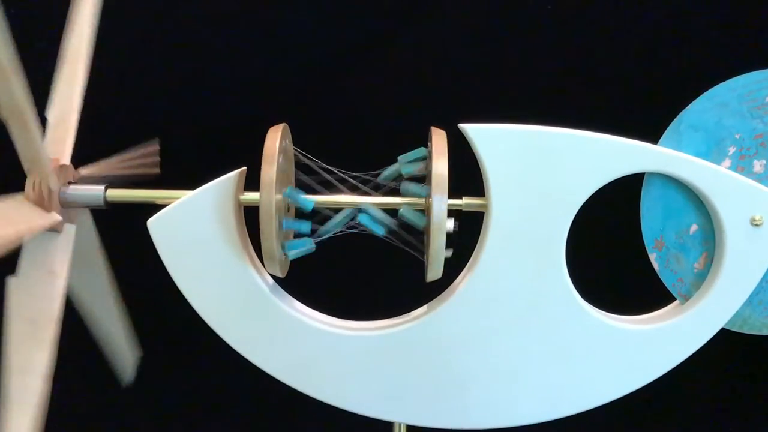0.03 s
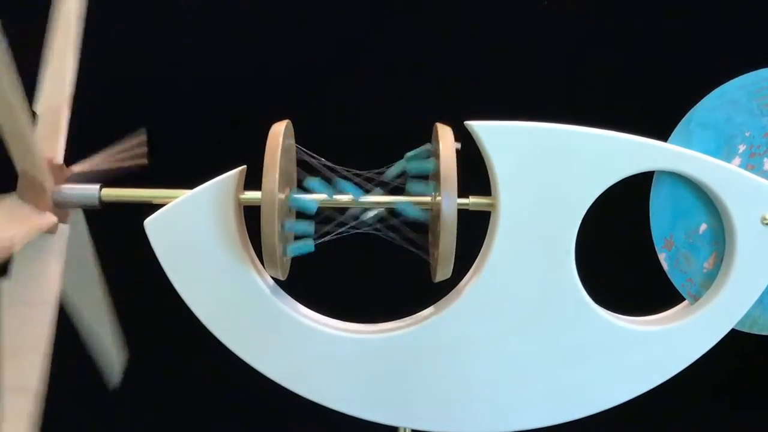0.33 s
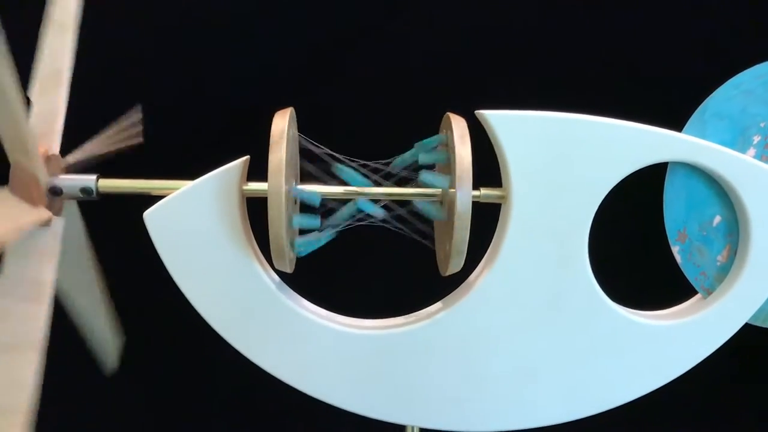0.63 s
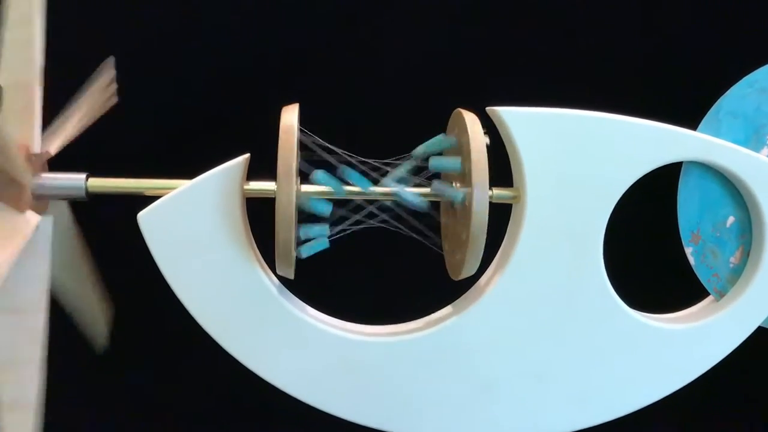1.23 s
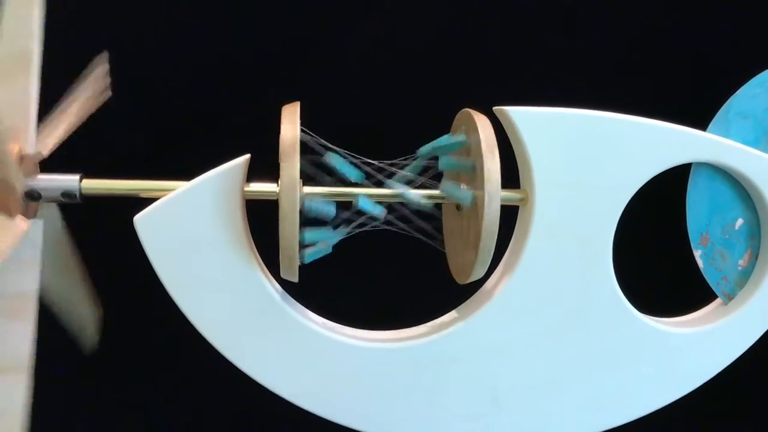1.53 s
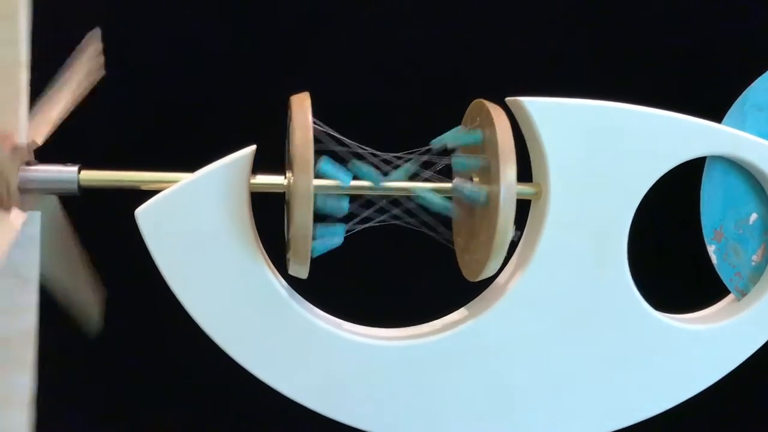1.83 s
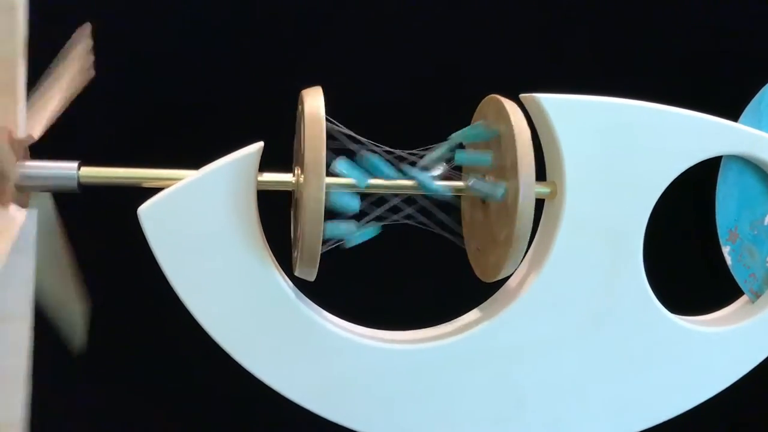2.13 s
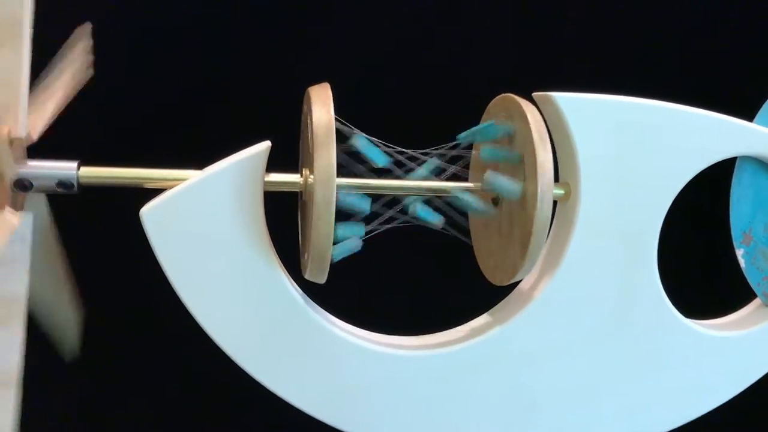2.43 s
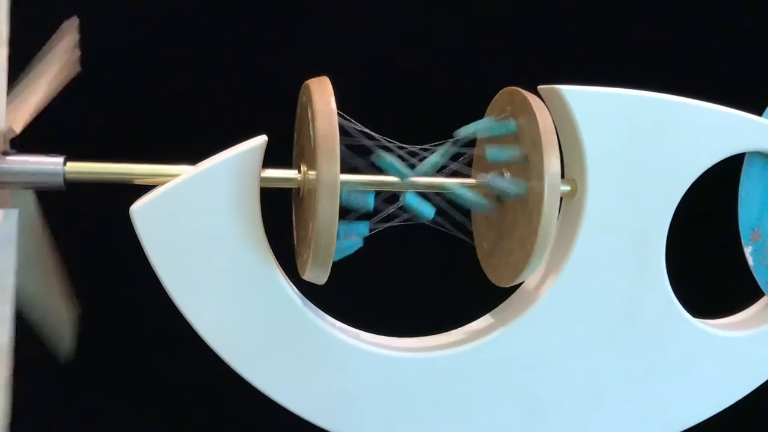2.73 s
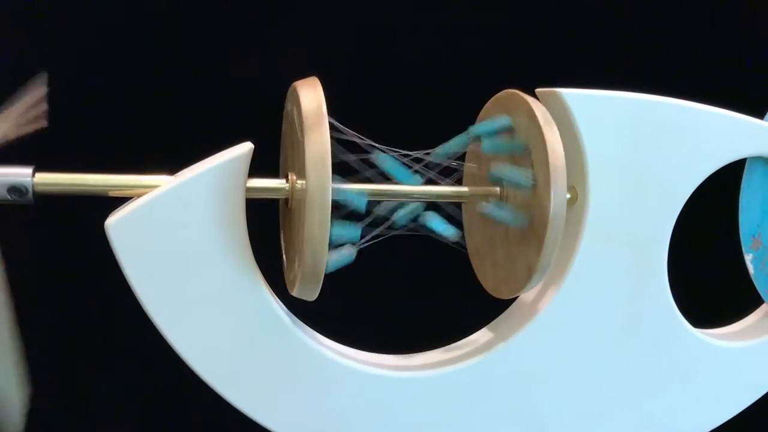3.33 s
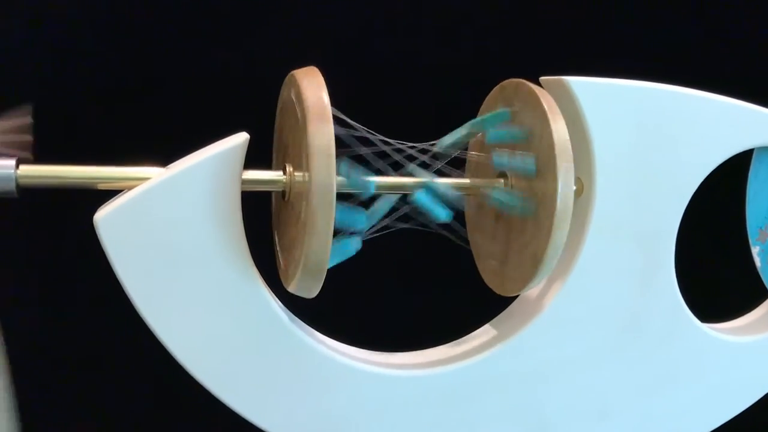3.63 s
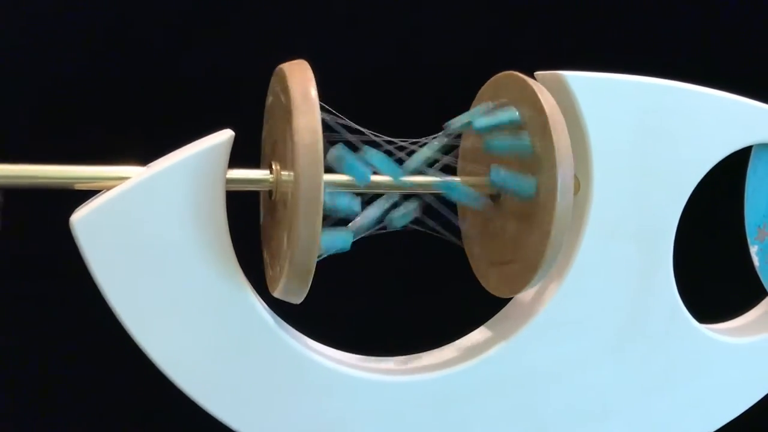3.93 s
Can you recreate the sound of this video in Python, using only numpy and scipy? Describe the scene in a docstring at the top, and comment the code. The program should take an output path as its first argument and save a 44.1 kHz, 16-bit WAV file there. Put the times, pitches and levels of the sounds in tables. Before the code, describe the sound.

Small tubes clatter against each other and two wooden discs on a turning sculpture, a quick, uneven run of light knocks, high pings and clicks. Behind it are faint room air and hum, and two low microphone bumps.

```python
"""You first hear light, uneven clattering: wooden knocks, short pings and bright clicks.
It is a wind toy turning slowly in a room. Small tubes slide on strings between two wooden discs
and drop against the discs and each other. A longer ring swells twice a turn, and a few sharp snaps
stand out. Behind it are two low bumps on the microphone, faint air and mains hum."""
import sys
import numpy as np
from scipy import signal
from scipy.fft import rfft, irfft
from scipy.io import wavfile

SR = 44100
rng = np.random.default_rng(int(sys.argv[2]) if len(sys.argv) > 2 else 0)


def to_wav(sig):
    """Store sig (one row per channel, or 1-D mono) as 16-bit WAV at the path in sys.argv[1].

    Samples outside -1..1 are clipped; the rate is SR.
    """
    pcm = np.clip(np.atleast_2d(sig), -1, 1) * 32767
    pcm = np.round(pcm).astype(np.int16)
    wavfile.write(sys.argv[1], SR, pcm.T)  # frames by channels


N = 176400
AGE = np.arange(SR // 3) / SR  # seconds since a blow
BLOW_GAIN = np.sqrt(.01 * SR)  # a blow's levels count its energy as if spread over 10 ms
TOP_HZ = 16000

# The blows of the falling tubes: t/s, knock level/dB, ping level/dB, ping f/Hz, click level/dB
BLOWS = [(0.0317, -41, -46, 4270, -36.5), (0.0577, -39, -38.5, 4370, -37),
         (0.0844, -38.5, -40.5, 3930, -40.5), (0.1641, -35.5, -33, 4410, -37),
         (0.2134, -46, -42, 4520, -41), (0.2641, -48, -28.5, 4430, -38.5), (0.3071, -45, -32, 4560, -41.5),
         (0.352, -44.5, -33.5, 4490, -44.5), (0.4413, -50, -36, 4540, -39),
         (0.504, -39.5, -41.5, 4150, -38.5), (0.538, -38, -41.5, 3900, -43),
         (0.5564, -40.5, -42, 4500, -38.5), (0.6108, -35.5, -38.5, 4000, -41.5),
         (0.633, -40.5, -31.5, 4400, -35), (0.733, -44, -29.5, 4400, -39),
         (0.7611, -40, -27.5, 4380, -30.5), (0.8303, -52, -31.5, 4590, -43), (0.8429, -50, -33, 4520, -42),
         (0.8665, -39, -37, 4210, -43.5), (0.9321, -38, -40.5, 4220, -50), (0.9773, -41, -42, 4660, -32),
         (1, -39.5, -38, 4260, -40), (1.0265, -38.5, -42, 3840, -39.5), (1.0934, -35.5, -28, 4420, -33),
         (1.209, -44.5, -28, 4510, -36.5), (1.2399, -46.5, -29.5, 4550, -33),
         (1.276, -47.5, -40.5, 4400, -40), (1.3126, -45, -34.5, 4450, -49), (1.3716, -48, -33, 4670, -34.5),
         (1.414, -42.5, -37.5, 4640, -39.5), (1.4376, -38.5, -42.5, 4150, -38),
         (1.4591, -36, -43, 3940, -38), (1.4903, -40.5, -39.5, 4390, -39.5),
         (1.5435, -40, -31.5, 4380, -41.5), (1.5665, -36, -43, 4000, -38), (1.636, -43.5, -27, 4450, -34.5),
         (1.6796, -47.5, -39.5, 4430, -38), (1.7422, -44, -33.5, 4370, -51),
         (1.7616, -44.5, -31.5, 4680, -38.5), (1.7996, -54, -33.5, 4750, -39.5),
         (1.8143, -40.5, -44, 4000, -54), (1.864, -35.5, -38.5, 4130, -41.5), (1.904, -43, -38, 4540, -42),
         (1.9153, -38, -36.5, 4400, -38.5), (1.953, -36.5, -51, 4400, -35.5),
         (2.0021, -40.5, -34, 4140, -40.5), (2.0172, -35.5, -38, 4830, -32.5),
         (2.1, -44, -28.5, 4420, -33.5), (2.178, -44.5, -27, 4730, -31), (2.2868, -46, -33.5, 4640, -30.5),
         (2.3257, -39.5, -35, 4590, -36), (2.3771, -33.5, -44, 4380, -35.5),
         (2.419, -40.5, -40.5, 4400, -38), (2.4619, -43, -34, 4570, -31.5), (2.4659, -33.5, -33, 4790, -41),
         (2.552, -43.5, -36, 4690, -33), (2.6157, -39.5, -33.5, 4380, -45.5),
         (2.6665, -46.5, -33.5, 4700, -39.5), (2.6919, -47, -34, 4470, -39.5),
         (2.7611, -34, -42, 4020, -45), (2.8185, -36, -36, 4220, -34.5), (2.8274, -37.5, -41, 4500, -33.5),
         (2.8529, -37.5, -55, 3930, -31.5), (2.9194, -34, -29, 4410, -31.5),
         (2.9983, -40, -28.5, 4430, -33.5), (3.0882, -37, -29, 4730, -33),
         (3.1724, -42.5, -33, 4690, -32.5), (3.206, -36.5, -34.5, 4590, -34), (3.233, -39, -40, 3880, -37),
         (3.2655, -32.5, -49, 4000, -36.5), (3.2937, -41.5, -43, 4400, -37),
         (3.3351, -34, -37, 4700, -30.5), (3.3439, -37, -33, 4340, -35), (3.4243, -40, -36.5, 4730, -31.5),
         (3.496, -37.5, -30.5, 4460, -30), (3.517, -46, -34.5, 4160, -40), (3.53, -43, -38, 4670, -35.5),
         (3.5547, -35, -39.5, 3820, -45), (3.6517, -34.5, -46, 4160, -45.5),
         (3.6625, -41, -37, 4650, -33.5), (3.6853, -35, -37.5, 4170, -37.5),
         (3.722, -35.5, -65, 4470, -30.5), (3.7696, -42, -30.5, 4440, -39), (3.7806, -34.5, -40, 4460, -32),
         (3.8284, -44, -38, 4720, -38.5), (3.9035, -47.5, -35.5, 4400, -41.5),
         (3.9354, -44.5, -27.5, 4680, -27), (3.9685, -43.5, -36.5, 4370, -40),
         (3.9877, -39.5, -32, 4670, -34)]
def tubes():
    """Each falling tube strikes once and bounces faintly twice; parts so small give off no bass."""
    out = np.zeros(N)
    for start, *strike in BLOWS:
        sound = blow(start, *strike)
        add(out, start, sound)
        waits_s = np.cumsum(rng.exponential(.007, size=2))
        bounces_db = -14 + 2.5 * (rng.standard_normal(2) - np.arange(2))
        for wait, db in zip(waits_s, bounces_db):
            add(out, start + wait, undb(db) * sound)
    return signal.sosfilt(signal.butter(4, 747, "highpass", fs=SR, output="sos"), out)


def blow(start, knock_db, ping_db, ping_hz, click_db):
    """One blow knocks, pings and clicks at once; the other tubes ring along, heard in the room's echo."""
    knock = undb(knock_db) * (wood_knock() + long_ring(start))
    ping = undb(ping_db) * tube_ping(ping_hz)
    other_tubes = undb(ping_db - 17.5) * fading_tones([(4410, 0)], fade_s=.095)
    click = undb(click_db) * contact_click(click_db)
    echo = room_echo(undb(-6) * knock + undb(-15) * ping + other_tubes + undb(-12.5) * click)
    return BLOW_GAIN * (knock + ping + click + echo)


# The tones the wooden parts make when struck: f/Hz, level/dB
WOOD_TONES = [(860, -9), (1015, -5), (1450, -7), (1640, -5), (1970, 4.5), (2090, 5.5), (3370, 7.5)]
def wood_knock():
    """The struck wooden discs take a moment to answer, then quickly fall silent."""
    wood = fading_tones(WOOD_TONES, fade_s=.078) + undb(-4) * noise_burst(895, 4750, fade_s=.03)
    rise = 1 - np.exp(-AGE / .0006)
    return unit(wood * rise)


# The tones of the longer ring: f/Hz, level/dB
RING_TONES = [(2230, -2.5), (2440, -9.5)]
def long_ring(start):
    """A ring outlasts the knock; how loud it is depends on how far the toy has turned."""
    half_turn_s, loudest_at_s = .4532, .054
    swell = np.cos(2 * np.pi * (start - loudest_at_s) / half_turn_s)
    return undb(-12 + 7.5 * swell) * fading_tones(RING_TONES, fade_s=.19)


def tube_ping(hz):
    """The tube itself gives one short, high tone with a little noise."""
    tone = unit(np.sin(2 * np.pi * hz * AGE) * fade(.026))
    return unit(tone + undb(-5.5) * noise_burst(3535, 4775, fade_s=.019))


# The very high tones made where two parts meet: f/Hz, level/dB
CLICK_TONES = [(6420, 5), (10200, -2), (11550, -1.5), (14400, -10)]
def contact_click(db):
    """The parts click as they touch; the harder the click, the brighter it is."""
    tones = fading_tones(CLICK_TONES, fade_s=.021, db_per_octave=2.5 * (db + 31))
    return unit(tones + undb(-2) * noise_burst(4450, 12350, fade_s=.0105))


# Tubes landing on their rims: t/s, level/dB
RIM_LANDINGS = [(0.2641, -42.5), (1.095, -35), (3.3352, -27)]
def rim_snaps():
    """A tube landing on its hard rim snaps without echo, using only the highest click tones."""
    out = np.zeros(N)
    high_tones = CLICK_TONES[1:]
    lowest_hz = high_tones[0][0]
    for start, db in RIM_LANDINGS:
        snap = fading_tones(high_tones, fade_s=.021) + noise_burst(lowest_hz, TOP_HZ, fade_s=.0105)
        add(out, start, undb(db) * BLOW_GAIN * unit(snap))
    return out


def room_echo(sound):
    """Close echoes, then a soft, duller tail; they differ for each blow because the tubes move."""
    delay_s = .0045
    early, late = rng.standard_normal((2, len(AGE))) * (AGE > delay_s)
    late = signal.sosfilt(signal.butter(1, 12000, "lowpass", fs=SR, output="sos"), late)
    echoes = undb(14.5) * early * fade(.04) + late * fade(.33)
    return signal.fftconvolve(sound, unit(echoes))[:len(sound)]


# Low bumps on the microphone: t/s, level/dB, starting f/Hz
LOW_BUMPS = [(1.861, -34.5, 82.5), (3.814, -22, 187)]
def microphone_bumps():
    """Soft thumps on the microphone sink in pitch as they fade."""
    end_hz, sink_s, rise_s = 53.4, .0062, .0029
    loudness = (1 - np.exp(-AGE / rise_s)) * fade(.094)
    out = np.zeros(N)
    for start, db, start_hz in LOW_BUMPS:
        hz = end_hz + (start_hz - end_hz) * np.exp(-AGE / sink_s)
        add(out, start, undb(db) * loudness * np.sin(2 * np.pi * np.cumsum(hz) / SR))
    return out


# How strong the room's air noise is from low to high pitch: f/Hz, relative level/dB
AIR_SHAPE = [(25, -11.5), (65, -3), (210, -7.5), (310, -14), (4000, -21.5), (16000, -40.5)]
def room_air():
    """The still air of the room is a faint, steady noise, strongest in the bass."""
    hz, db = np.array(AIR_SHAPE).T
    all_hz = np.maximum(np.fft.rfftfreq(N, 1 / SR), 1)
    gains = undb(np.interp(np.log(all_hz), np.log(hz), db))
    air = irfft(rfft(rng.standard_normal(N)) * gains, N)
    return undb(-58.5) * air / np.std(air)


def mains_hum():
    """Mains electricity hums on one low, steady tone."""
    hum_hz = 119.5
    return undb(-58.5) * np.sqrt(2) * np.sin(2 * np.pi * hum_hz * np.arange(N) / SR)


def fading_tones(table, fade_s, db_per_octave=0):
    """A struck part rings: its first tone lasts fade_s, higher ones die sooner. No two blows are alike."""
    hz, db = np.array(table).T
    level_luck, pitch_luck, sign_luck = rng.standard_normal((len(table), 3)).T
    gains = np.sign(sign_luck) * undb(db + 2.5 * level_luck + db_per_octave * np.log2(hz))
    waves = np.sin(2 * np.pi * np.outer(hz * (1 + .0216 * pitch_luck), AGE))
    fades = fade(fade_s * hz[0] / hz[:, None])
    return unit(gains @ (waves * fades))


def noise_burst(low_hz, high_hz, fade_s):
    """The many short-lived tones of a blow blur into a burst of noise."""
    noise = rng.standard_normal(len(AGE)) * fade(fade_s)
    band = signal.butter(4, [low_hz, high_hz], "bandpass", fs=SR, output="sos")
    return unit(signal.sosfilt(band, noise))


def fade(seconds):
    """Die away after a blow, falling by 60 dB in the given time."""
    return np.exp(-np.log(1000) * AGE / seconds)


def undb(db):
    """Turn decibels into a number to multiply by."""
    return 10 ** (np.asarray(db) / 20)


def unit(sound):
    """Scale to an energy of 1."""
    return sound / np.sqrt(np.sum(sound ** 2))


def add(track, start, sound):
    """Mix a sound in, start seconds into the track."""
    i = int(start * SR)
    track[i:i + len(sound)] += sound[:max(N - i, 0)]


def scene():
    """The toy and its background together, in one channel."""
    return (tubes() + rim_snaps() + microphone_bumps() + room_air() + mains_hum())[None]


def record(dry):
    """Cut the deepest rumble and the very highest treble."""
    dry = signal.sosfilt(signal.butter(2, 30, "highpass", fs=SR, output="sos"), dry)
    return signal.sosfilt(signal.ellip(8, .2, 70, TOP_HZ, fs=SR, output="sos"), dry)


dry = scene()
out = record(dry)
to_wav(out)
```